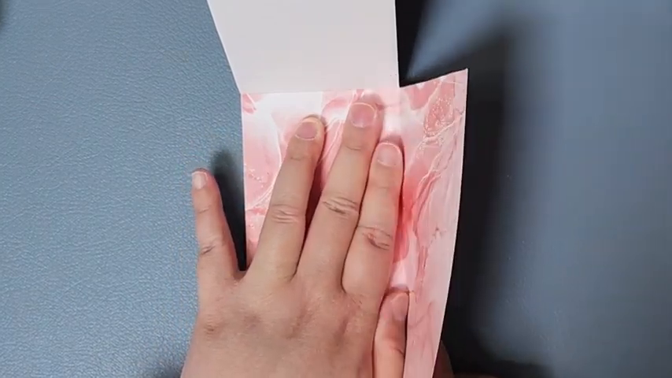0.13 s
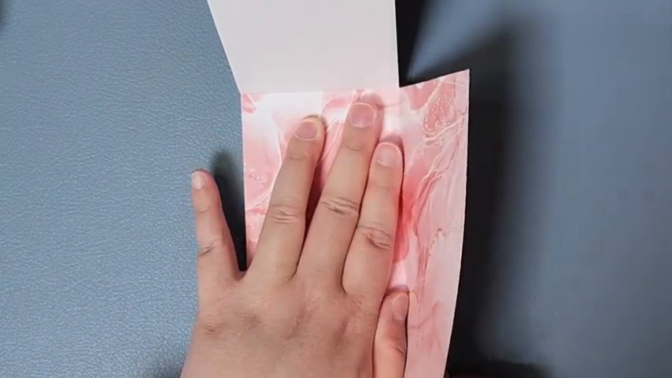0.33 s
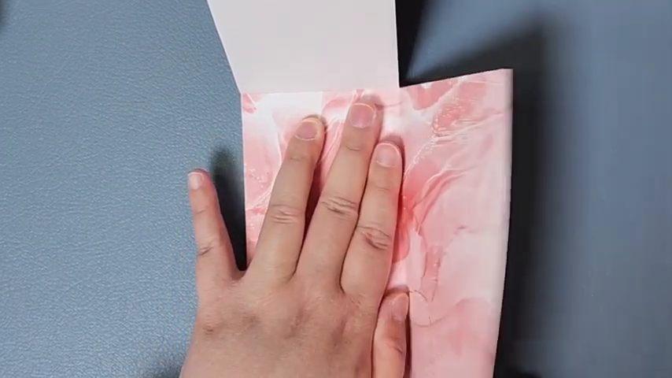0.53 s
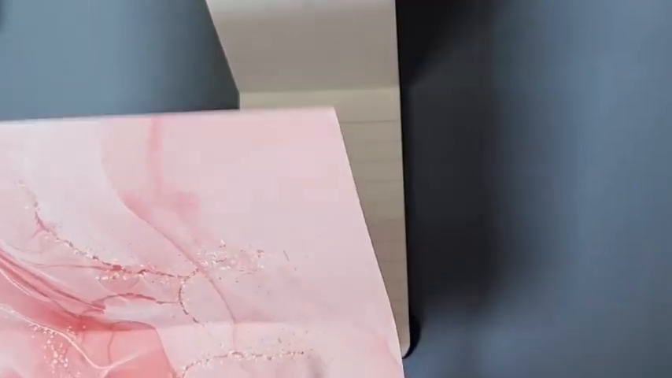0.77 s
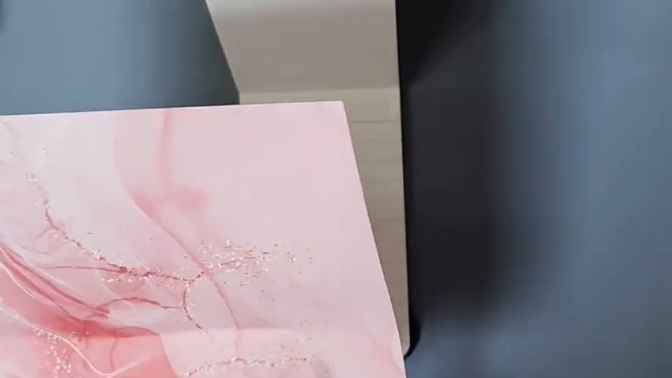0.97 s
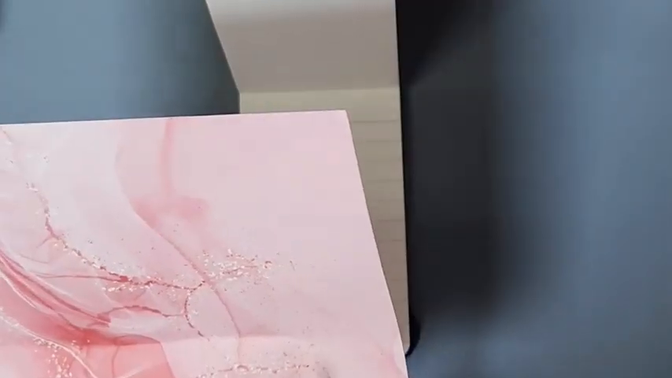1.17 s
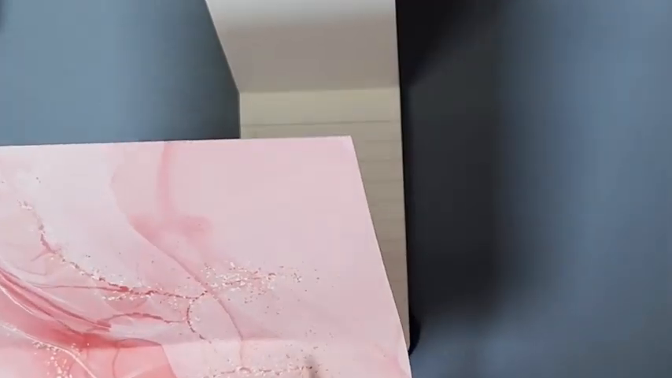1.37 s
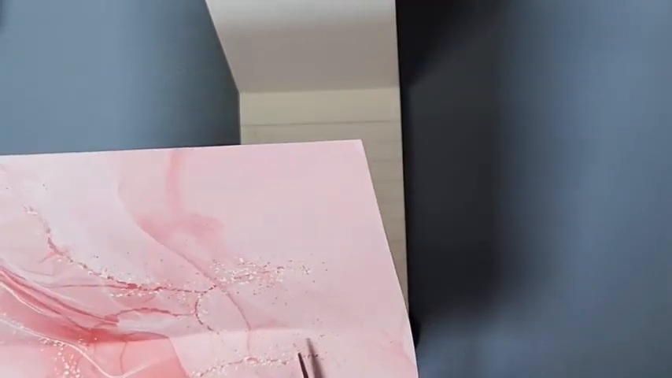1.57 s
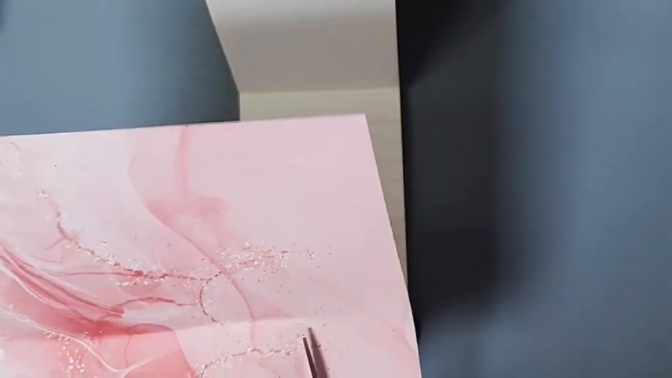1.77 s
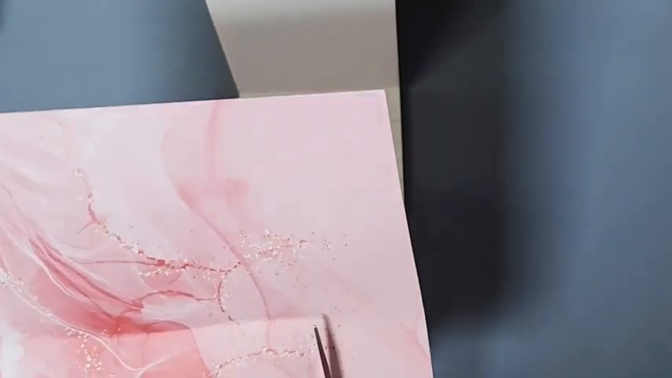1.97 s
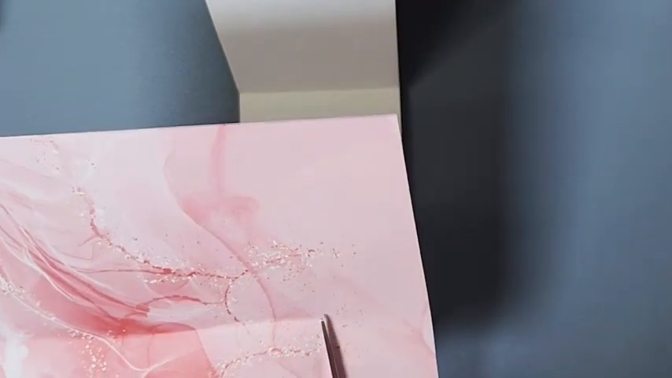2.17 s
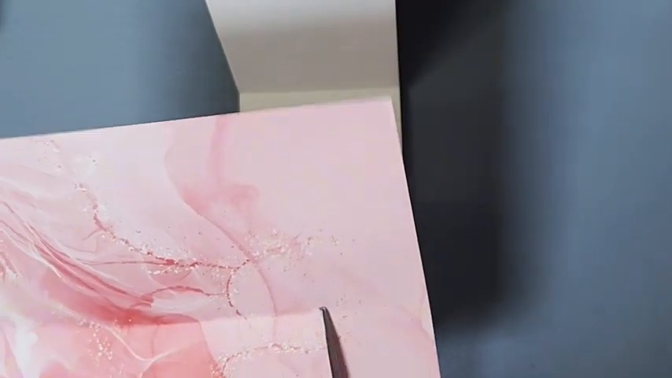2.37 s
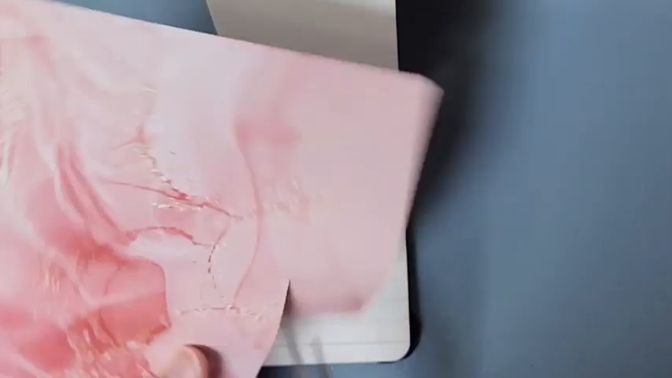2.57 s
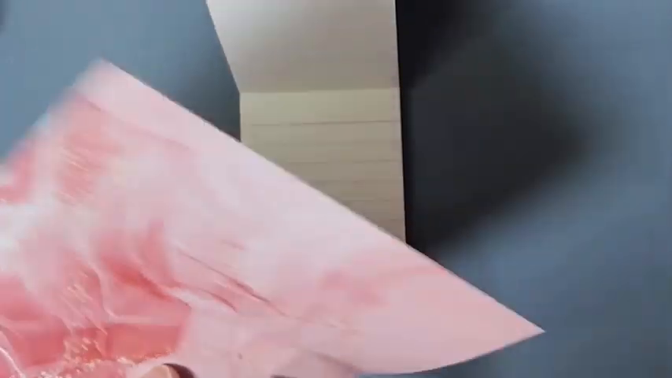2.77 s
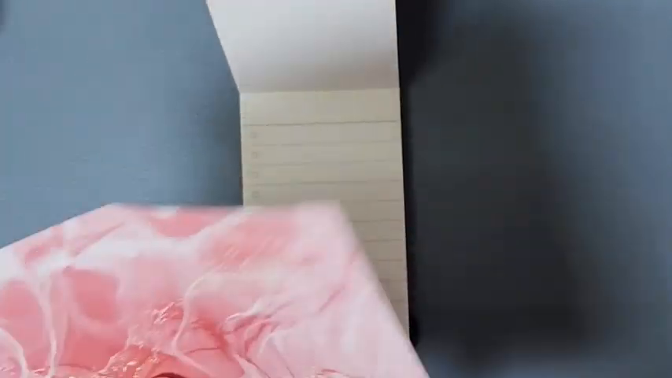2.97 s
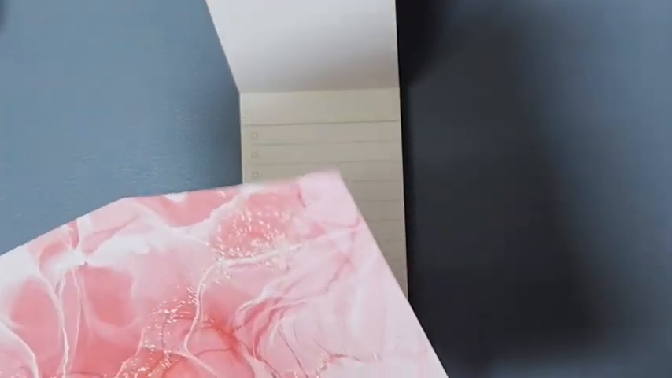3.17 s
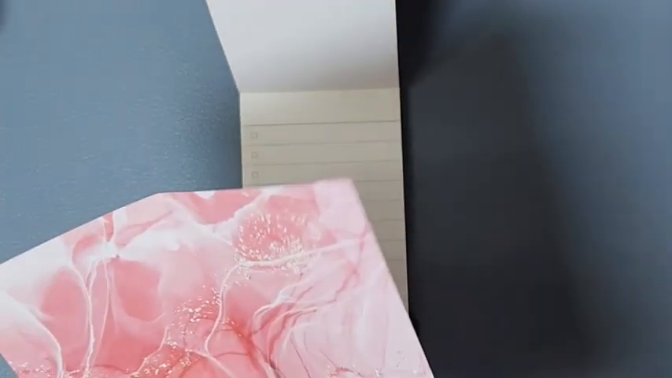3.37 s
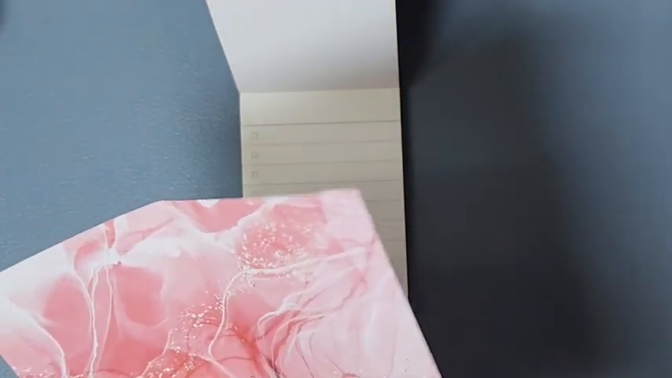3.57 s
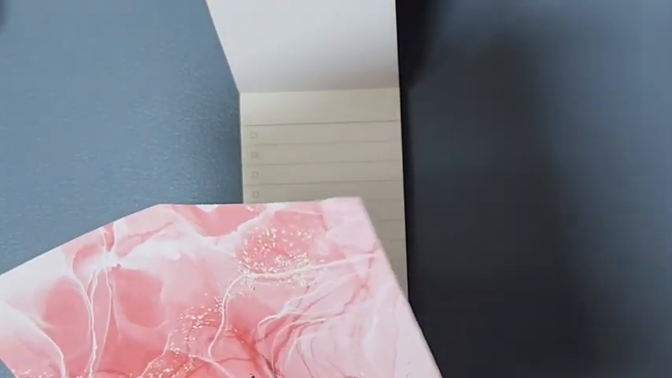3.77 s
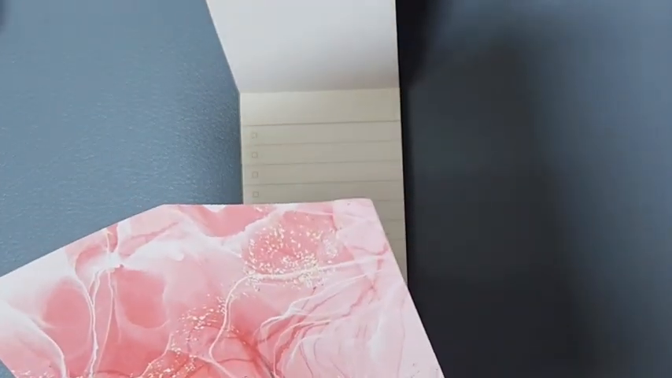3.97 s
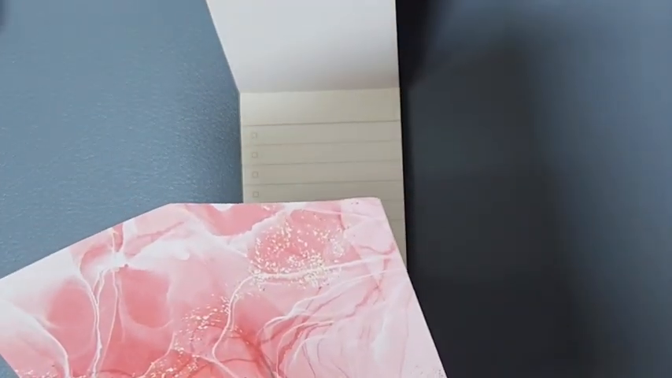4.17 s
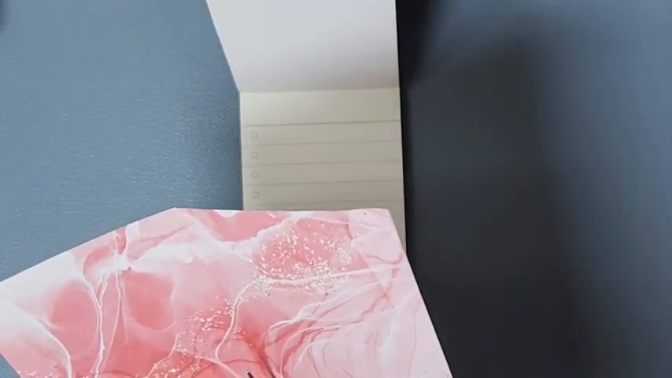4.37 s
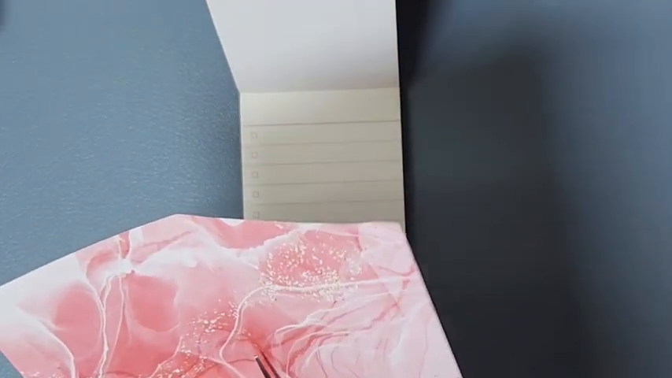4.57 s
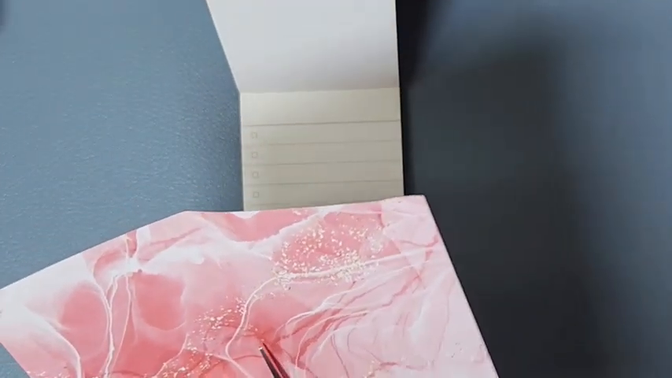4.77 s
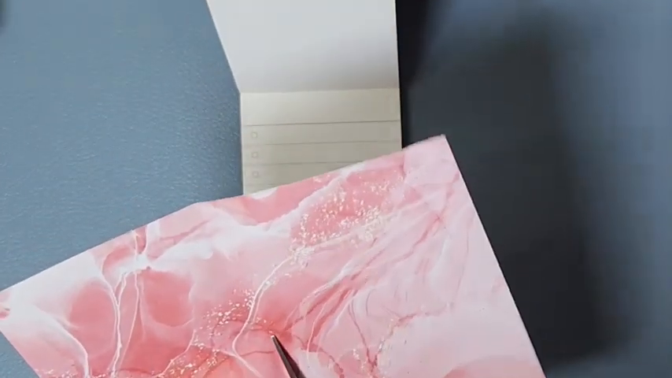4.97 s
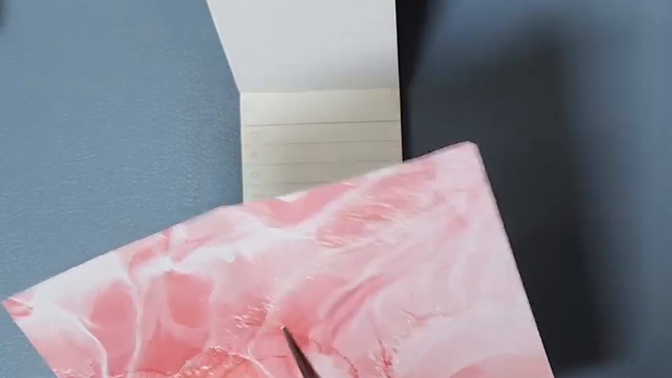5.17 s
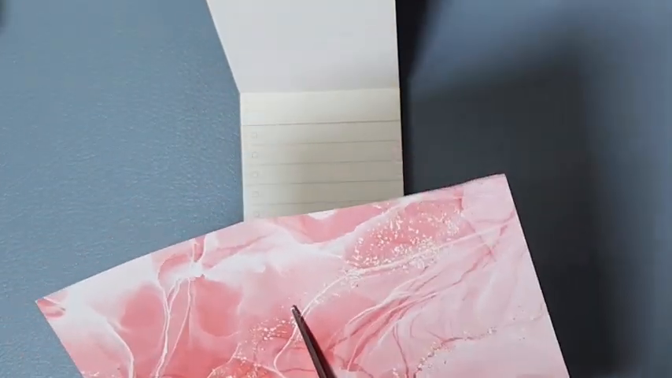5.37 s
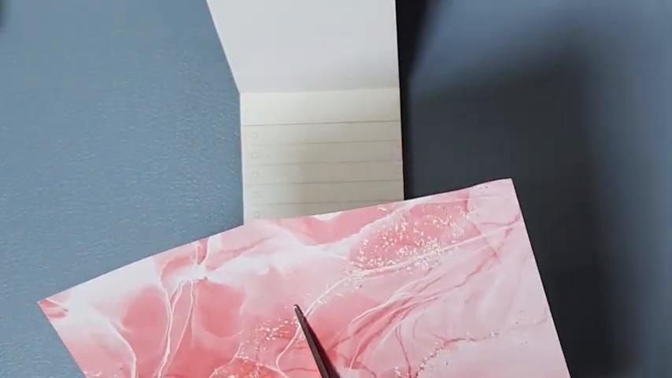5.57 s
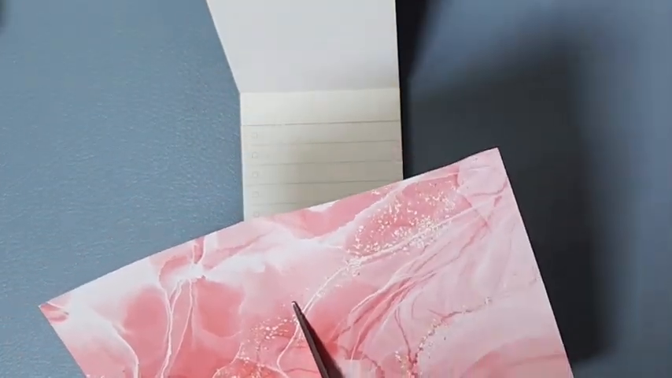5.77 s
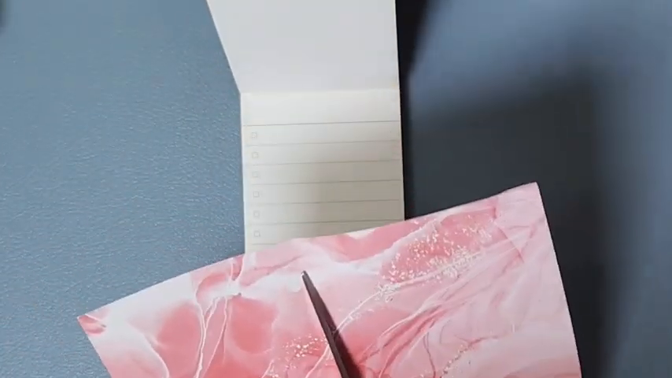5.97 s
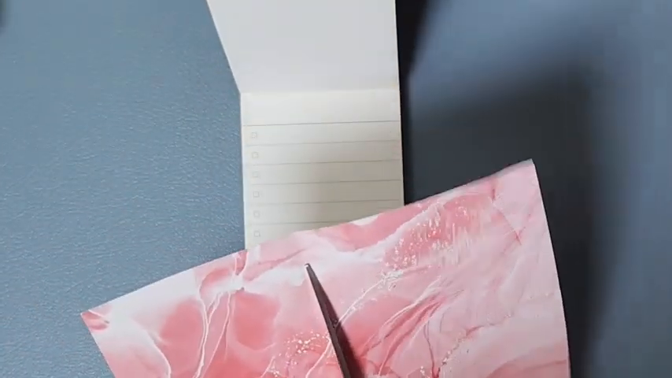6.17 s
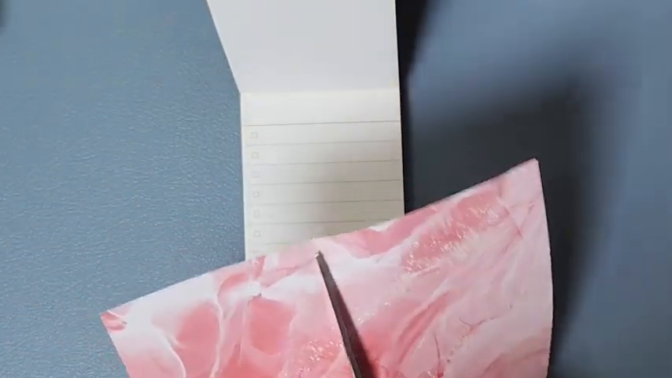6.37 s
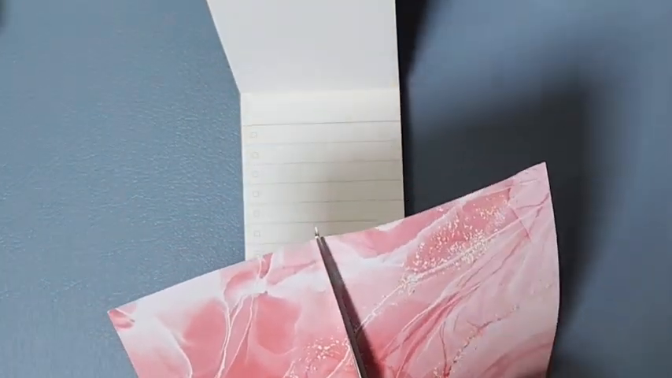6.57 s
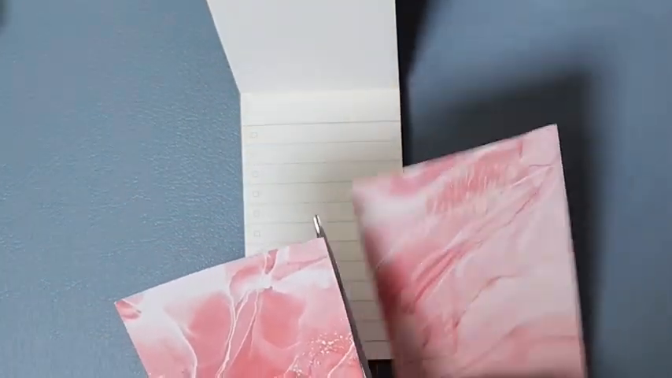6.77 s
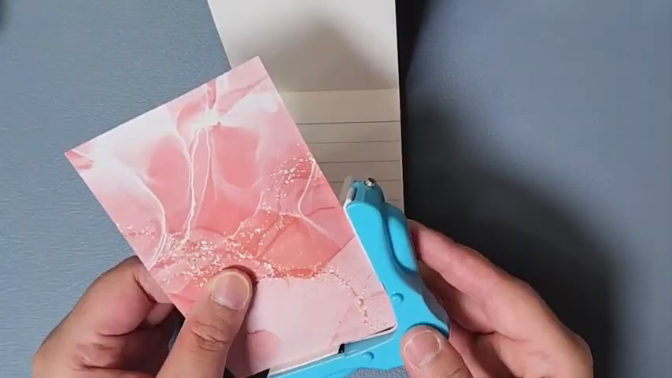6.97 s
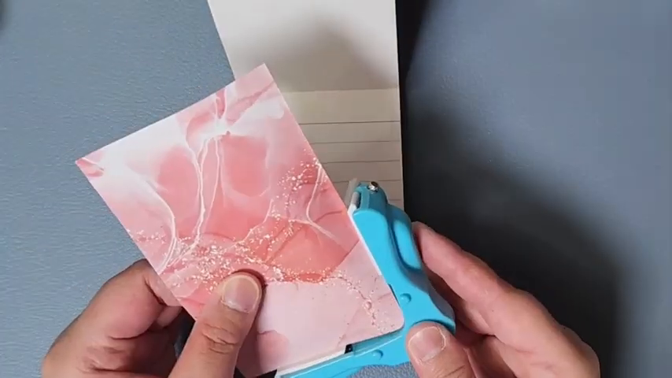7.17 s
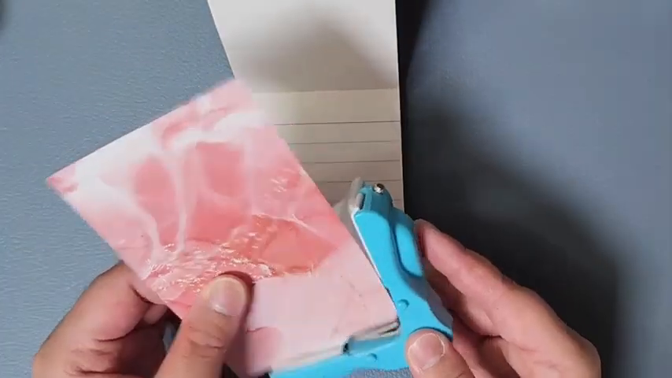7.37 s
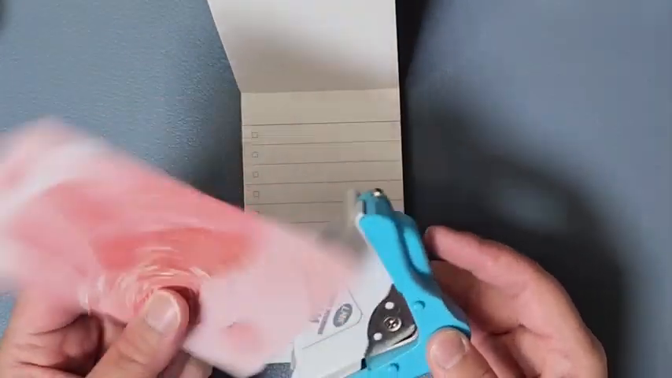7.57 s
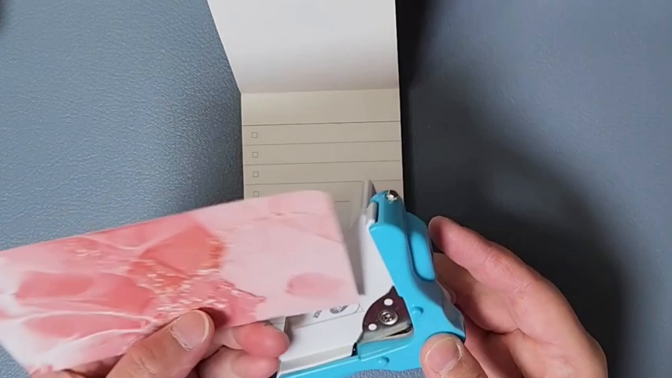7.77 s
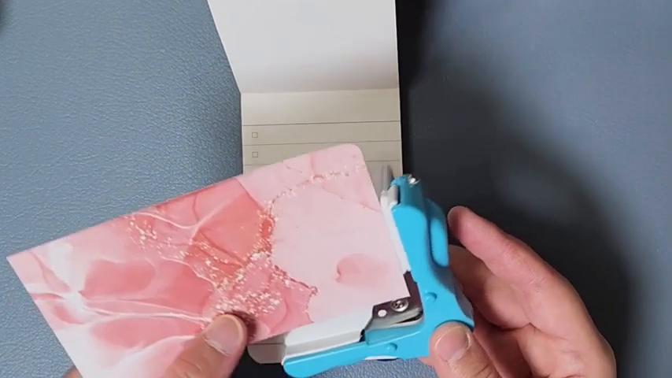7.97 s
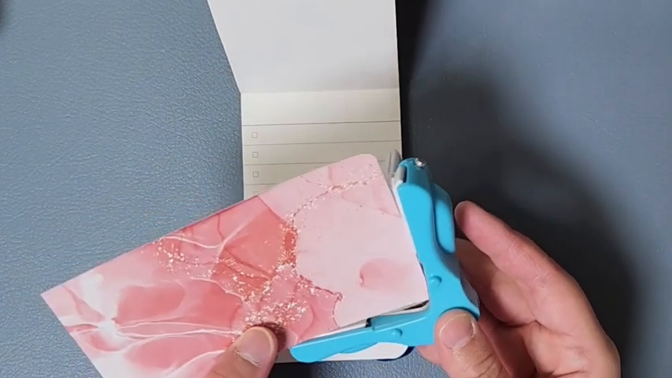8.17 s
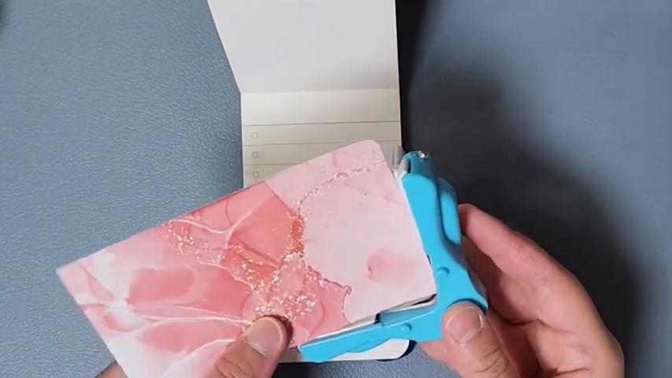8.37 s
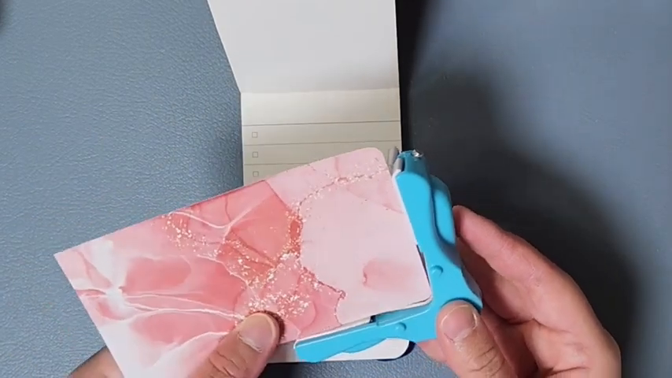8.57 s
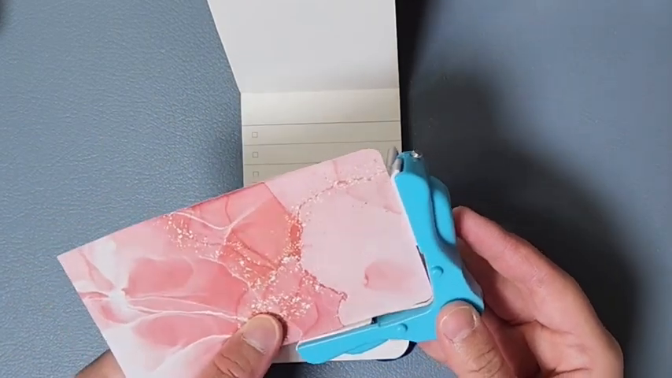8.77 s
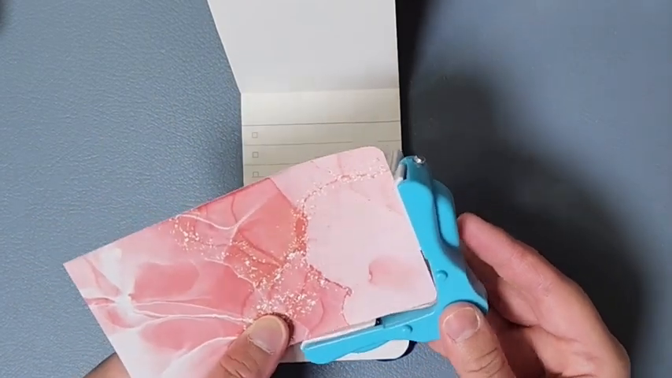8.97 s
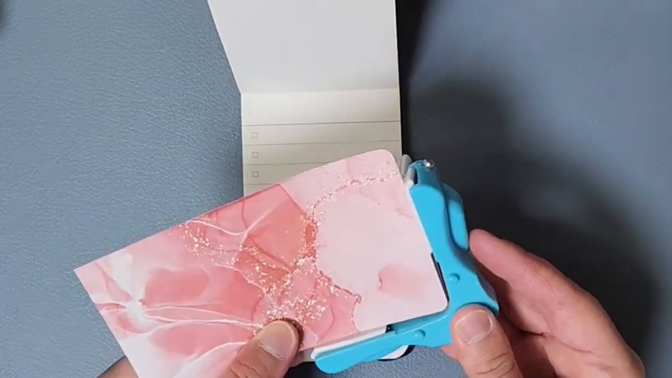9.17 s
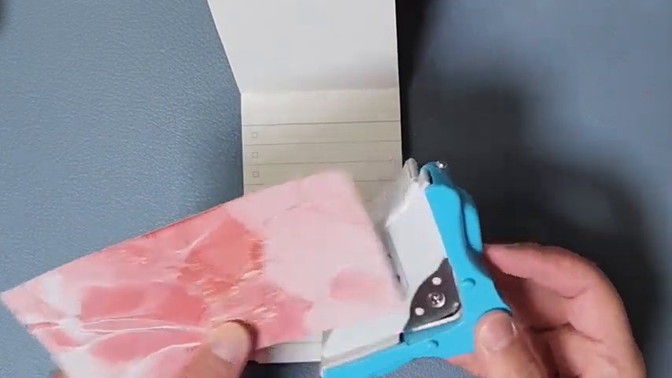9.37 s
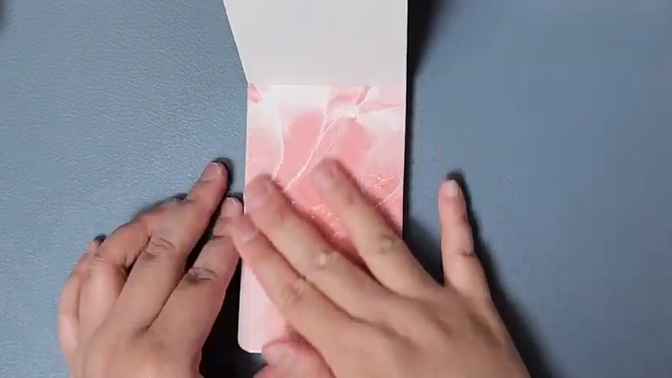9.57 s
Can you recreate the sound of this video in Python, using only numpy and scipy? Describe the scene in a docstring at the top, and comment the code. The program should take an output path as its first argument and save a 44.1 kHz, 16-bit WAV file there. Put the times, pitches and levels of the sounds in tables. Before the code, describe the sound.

A small quiet room, miked very close, with a faint hiss and low drone. From 0.1 s a sheet rustles briefly; dull fingertip thuds follow at 0.3 and 0.6 s. From 1.15 to 1.75 s scissors shear paper, gritty friction breaking into crunchy slips with a thin steel ring; the blades rub open, and a shorter, sharper cut ends in snaps at 2.3 s. A crisp flap of paper, knocks and rustling run to about 3.3 s, then it is quieter. A slow cut builds from 4.3 to 5.05 s, followed by short snips at 5.6, 6.15 and 6.7 s with rubbing blades between. Paper and handles knock around 6.8-7 s. A plastic punch cracks card at 7.2 s, its lever clacking at 7.25 and 7.45 s with rattle and thump. Light fumbling ticks follow; the punch bites again at 9.06 s, clacking at 9.1 and 9.33 s, then soft smoothing at 9.5 s.

```python
"""A low drone and faint hiss, then, close by, a sheet rustles and fingertips thud on a padded desk.
Scissors trim the sheet: gritty friction catches, breaks into slips of tearing fibres and rings the steel;
the blades rub as they open, the sheet rustles, hisses and crackles between the cuts, and things knock.
Then a plastic punch bites two corners of the card: bursts of cracking, stops with a rattle, damped spring
tones and a desk thump. A hand smooths the card. Noise through resonances makes all but the pure tones."""
import sys
import numpy as np
from scipy import signal
from scipy.fft import rfft, irfft, next_fast_len
from scipy.io import wavfile
from scipy.ndimage import uniform_filter1d, map_coordinates

SR = 44100
rng = np.random.default_rng(int(sys.argv[2]) if len(sys.argv) > 2 else 0)


def master_out(mix):
    """Clip the mix to full scale and print it as 16-bit PCM to the path in sys.argv[1]."""
    frames = np.transpose(np.atleast_2d(mix))
    ceiling = np.clip(frames, -1, 1)
    pcm = np.round(ceiling * 32767).astype(np.int16)
    wavfile.write(sys.argv[1], SR, pcm)


N = 423801   # samples

# Low drone in the room. Each row: centre in Hz, width in Hz, level in dB.
DRONE_BANDS = [(45, 4.8, -57), (58.2, 6.8, -56), (126, 9.6, -64.5)]
# Spectrum of the faint hiss. Each row: frequency in Hz, gain in dB.
HISS_SPECTRUM = [(100, -6), (220, -8.5), (350, -17.5), (800, -22), (2300, -27), (6800, -23.5), (7300, -33),
                 (15000, -33)]
HISS_DB = -62.5

# The sheet is slid, turned or smoothed. Each row: start in seconds, length in seconds, rustle in dB,
# flexing relative to rustle in dB, hiss relative to rustle in dB.
SLIDES_OF_SHEET = [(0.101, 0.068, -45, -8.5, -15), (0.205, 0.085, -45.5, -5.5, -12.5),
                   (0.484, 0.16, -54.5, -4, -17), (0.615, 0.037, -38, -8, 2.5),
                   (0.741, 0.13, -54, -15, -4.5), (1.002, .07, -47.5, -11, -4),
                   (2.393, 0.069, -57, 3.5, -1), (2.457, 0.2, -39, -6, 3), (2.558, 0.03, -25, -8.5, 0.5),
                   (2.613, 0.055, -41.5, -22, 6.5), (2.75, 0.23, -35, -5, -1.5),
                   (2.97, 0.14, -50.5, -10.5, 1.5), (3.2, 0.24, -53.5, 1, 0), (3.293, 0.022, -42, 4, -1),
                   (6.822, .04, -43.5, -3.5, -2.5), (6.851, 0.05, -31, -9.5, -6),
                   (7.14, 0.034, -36, -14.5, -9), (7.605, 0.26, -53, -4.5, 4), (7.978, 0.58, -59, 3, 1),
                   (8.496, 0.057, -50.5, -1, -3), (9.414, 0.061, -49.5, -5.5, 3.5),
                   (9.512, .1, -43.5, -7, 2.5)]
SLIDE_ATTACK_S, SLIDE_SAG_DB_PER_S = 0.032, 16
SLIDE_RELEASE = 2.2   # t60 of the dying slide, in lengths of the slide
# Spectrum of moving paper. Each row: frequency in Hz, gain in dB.
PAPER_SPECTRUM = [(88, -31.5), (150, -2), (396, -7.5), (471, -5), (966, -7.5), (1290, -5.5), (2060, -4),
                  (3690, -4.5), (4060, -8.5), (9540, -18.5), (15500, -27)]
# Resonances of the held sheet. Each row: centre in Hz, width in Hz, gain in dB.
SHEET_RESONANCES = [(546, 85, 1), (1260, 50, 9), (3700, 460, -1)]
SHEET_HZ, HOUSING_HZ = 1300, 1680   # main resonances of the sheet and of the punch housing
RESONANCE_OCTAVES = 0.22   # half width of a body's main resonance

# Jolts that reach the desk. Each row: start in seconds, level in dB.
DESK_JOLTS = [(0.121, -32.5), (2.344, -30.5), (2.55, -25), (2.919, -36), (9.05, -17)]
JOLT_HZ, JOLT_T60 = 86, 0.073   # Hz, seconds
# Fingertips landing on the paper. Each row: start in seconds, level in dB.
FINGER_TAPS = [(.338, -25.5), (.346, -25), (0.58, -24.5), (0.598, -28.5), (0.635, -30.5)]
# Spectrum of a fingertip on the pad. Each row: frequency in Hz, gain in dB.
TAP_SPECTRUM = [(200, -5), (460, -7.5), (620, 1.5), (880, 1), (1200, -27.5), (1550, -21.5), (2500, -52)]

# Strokes of the scissors. Each row: start in seconds, end in seconds, shear at the start in dB,
# shear at the end in dB, added first bite in dB, blade ring in dB, blade ring halfway in Hz, sheet hum in dB.
STROKES = [(1.147, 1.739, -52.5, -43, 15, 4.5, 5305, -14.5),
           (2.127, 2.343, -48.5, -43, -0.5, -1.5, 4020, -6.5),
           (4.301, 5.059, -53, -37.5, -4, 1.5, 5200, -2.5), (5.585, 5.714, -44, -43, -4, -7, 4130, -0.5),
           (6.139, 6.243, -37.5, -45, 0, -6, 4010, 0), (6.66, 6.808, -42, -21, -6, -8.5, 3960, -9.5)]
# Colour of the slips of each stroke, from its first slip to its last. Each row: bass in dB,
# first treble in dB, last treble in dB, first sheet resonance in dB, last sheet resonance in dB.
STROKE_TONES = [(-5, 11, -4.5, -3, 3), (10, 0.5, 14, 8, -3.5), (-3.5, 6, -4, -10.5, 26),
                (2, -7, -2.5, 17, 12), (-13, -10, -15, 12, 1.5), (-14, -15, 8, -5.5, 2.5)]
BITE_S, RING_FADE_DB = 0.07, 11   # the first bite eases off; the ring is damped as the blades close
# Louder slips of the blades through the sheet. Each row: start in seconds, length in seconds,
# level in dB before a common trim.
BLADE_SLIPS = [(1.407, 0.042, -43.5), (1.443, 0.023, -39), (1.479, 0.019, -37.5), (1.53, 0.017, -36),
               (1.555, 0.013, -34), (1.574, 0.063, -34.5), (1.639, 0.013, -29), (1.664, 0.021, -26.5),
               (1.693, 0.017, -27.5), (1.724, 0.011, -31), (2.123, 0.0065, -45), (2.152, 0.0091, -23),
               (2.167, 0.013, -30), (2.192, 0.013, -22.5), (2.235, .016, -21.5), (2.261, 0.0099, -28.5),
               (2.299, 0.0043, -14.5), (2.32, 0.01, -22.5), (2.3387, 0.0062, -11.5), (4.578, 0.011, -52),
               (4.644, 0.0065, -40), (4.668, .012, -42), (4.747, 0.024, -38.5), (4.778, 0.017, -38.5),
               (4.822, .009, -36.5), (4.837, 0.017, -33.5), (4.859, 0.017, -35.5), (4.883, 0.034, -31.5),
               (4.92, 0.024, -27), (4.965, 0.011, -14), (5.007, 0.0069, -8.5), (5.035, 0.007, -34),
               (5.584, 0.0075, -31.5), (5.598, .012, -24.5), (5.614, 0.03, -23), (5.645, .013, -28),
               (5.671, 0.01, -18), (6.144, 0.014, -23), (6.158, 0.038, -24), (6.208, 0.0096, -13),
               (6.673, 0.026, -25), (6.709, 0.011, -16), (6.723, 0.01, -16), (6.737, 0.01, -12),
               (6.763, 0.0051, -9), (6.767, 0.012, -24), (6.787, 0.0089, -33)]
SLIP_S, SHORT_SLIP_DB_PER_OCTAVE = 0.018, 2   # a slip shorter than this is brighter, a longer one duller
CREAK_S = 0.005   # creak before and after a fracture
# Spectra of a slip and of the steady shear. Each row: frequency in Hz, gain in dB.
SLIP_SPECTRUM = [(180, -17), (330, -13), (519, -6), (703, -8.5), (951, 1.5), (1287, -2), (1743, 0),
                 (2359, -4.5), (3192, -0.5), (4321, -3), (5848, -8), (7915, -10.5), (10713, -11.5),
                 (14500, -21.5)]
SHEAR_SPECTRUM = [(150, -11), (480, -6), (800, -9), (1300, -5.5), (2200, -7), (3400, -4.5), (6700, -8),
                  (11000, -16), (15500, -20)]
# Steel resonances rung by the grit; each stroke scales them so that the second lies at its blade ring
# halfway. Each row: centre before scaling in Hz, width before scaling in Hz, level in dB.
BLADE_RESONANCES = [(4480, 220, -2), (5400, 390, 9), (7500, 350, -7), (9900, 500, -8.5), (13200, 700, -4.5)]

# Blades rubbing as they open. Each row: start in seconds, end in seconds, level in dB,
# treble in dB, squeak in dB.
BLADE_OPENINGS = [(1.852, 1.993, -36.5, 4, 1), (5.16, 5.353, -31, 0, -5.5),
                  (5.832, 6.017, -31.5, -2.5, -2.5), (6.336, 6.512, -26, -5.5, 4.5)]
# Spectrum of the rubbing blades. Each row: frequency in Hz, gain in dB.
OPENING_SPECTRUM = [(88, -69), (150, -13), (388, -10), (471, -6), (668, -11), (722, -8), (1020, -11),
                    (1370, -4.5), (2180, -6), (2450, -4), (2760, -8), (3620, -7), (15500, -24)]
SQUEAK_HZ = 2420

# Tools and card knocking in the hands. Each row: start in seconds, t60 in seconds,
# level in dB before a common trim, treble in dB, resonance in Hz.
HAND_KNOCKS = [(2.346, 0.096, -16.5, 7, 545), (2.509, 0.13, -25, 14, 1160), (2.555, .011, -15.5, 10, 374),
               (2.92, 0.06, -11.5, -20, 780), (5.014, 0.046, -38, -5, 1300), (5.683, 0.072, -22, 5, 1100),
               (6.217, 0.069, -21, 3, 1260), (6.805, .024, -9.5, -10, 894), (6.82, 0.06, -15.5, -38, 2510),
               (6.939, 0.024, -15, -10, 2740), (7.0403, 0.05, -13, -29.5, 1410),
               (7.4, 0.032, -19.5, -4.5, 740), (7.666, 0.067, -42.5, -13.5, 476),
               (7.712, 0.097, -36.5, 9, 457), (8.054, 0.033, -37.5, -33, 396),
               (8.15, 0.041, -29.5, -8.5, 1730), (8.31, 0.061, -30, -15, 1260), (8.457, 0.13, -44, 8, 475),
               (8.548, 0.1, -30, 3, 600), (8.653, 0.039, -36.5, 0, 497), (8.679, 0.048, -20, -11.5, 388),
               (8.979, 0.079, -21.5, -11, 1490), (9.032, 0.081, -31.5, 1, 4370),
               (9.068, 0.029, -17, -22, 1743), (9.078, 0.058, -16, -11, 1090),
               (9.324, 0.046, -23, -11, 1760)]
# Spectrum of knocks, ticks and scuffs. Each row: frequency in Hz, gain in dB.
KNOCK_SPECTRUM = [(180, -4.5), (330, -2.5), (519, -2.5), (703, -1), (951, -7), (1287, -2.5), (1743, -3.5),
                  (2359, -5.5), (3192, -7), (4321, -9), (5848, -16.5), (7915, -17.5), (10713, -22),
                  (14500, -27.5)]
KNOCK_HZ, KNOCK_BASS_DB_PER_OCTAVE = 850, 7   # a knock pitched below this carries more bass
# Light ticks of card and plastic. Each row: start in seconds, level in dB.
LIGHT_TICKS = [(2.612, -32), (2.852, -30), (3.344, -46), (5.54, -49), (6.283, -41), (7.11, -42.5),
               (7.138, -39.5), (7.817, -45), (8.01, -45.5), (8.508, -41), (8.739, -49), (8.955, -51),
               (9.277, -40)]

# The sheet scuffs the blades or the fingers as it is lined up. Each row: start in seconds,
# length in seconds, level in dB.
SHEET_SCUFFS = [(3.172, 0.19, -50), (5.068, 0.052, -56), (5.349, .08, -55), (6.292, 0.038, -47),
                (6.527, 0.074, -50.5), (6.602, 0.073, -47.5), (8.218, 0.086, -53.5)]

# The die cracks through the card. Each row: start in seconds, level in dB before a common trim, treble in dB.
DIE_CRACKS = [(7.2004, -5, 16), (7.2098, -9, -0.5), (7.2322, -5, -6), (9.063, -12.5, 15.5)]
CRACK_S, CRACK_BASS_DB, CRACK_HOUSING_DB = 0.0037, 2, 17.5
# The punch lever hits its stop, pressed then released. Each row: start in seconds, level in dB before a
# common trim, treble in dB, housing resonance in dB, rattle in dB, spring in dB, desk thump in dB.
LEVER_STOPS = [(7.249, -6.5, 15, -15, -13.5, -52.5, -28), (7.45, -5.5, 13.5, 14.5, -18, -46, -19.5),
               (9.1118, -9.5, 21, 14.5, -12.5, -38, -19.5), (9.333, -8, 8.5, 12, -17.5, -52, -12.5)]
STOP_S, STOP_BASS_DB = 0.005, 3.5
# Spectrum of cracks, stops and rattle. Each row: frequency in Hz, gain in dB.
SNAP_SPECTRUM = [(180, -7), (330, -11), (519, -10.5), (703, -8), (951, -5), (1287, 1), (1743, 0.5),
                 (2359, 0.5), (3192, 1), (4321, -4.5), (5848, -4), (7915, -5), (10713, -10), (14500, -22)]
RATTLE_DELAY_S, RATTLE_T60, RATTLE_BASS_DB, RATTLE_TREBLE_DB = 0.0075, 0.11, 3, 4
THUMP_DELAY_S, THUMP_HZ, THUMP_T60 = 0.0073, 72, 0.15
# Tones of the punch's spring. Each row: frequency in Hz, relative level in dB, t60 in seconds.
SPRING_TONES = [(5071, -6.5, .35), (6740, 7, .12), (7660, 6, 0.14)]

# Narrow resonances of the desk and the things on it. Each row: centre in Hz, width in Hz, gain in dB.
DESK_RESONANCES = [(479.2, 10, 4.5), (1091, 15, 4.5), (1312, 32, 4), (1669, 46, 4), (2436, 73, 4.5),
                   (3747, 210, 2), (6820, 140, 0.5)]
TAIL_DB, TAIL_T60 = -34, 0.28   # dull tail of the room
PEAK_LIMIT, CUTOFF_HZ = 1.02, 15700


def from_db(db):
    """Decibel law: 20 dB is a tenfold amplitude."""
    return 10 ** (np.asarray(db) / 20)


def rms_one(x):
    """Normalisation to unit effective value."""
    return x / np.sqrt(np.mean(x ** 2) + 1e-20)


def at_hz(points, hz):
    """Spectral gain in dB, interpolated on a logarithmic frequency axis."""
    table = np.array(points)
    return np.interp(np.log(hz + 1), np.log(table[:, 0]), table[:, 1])


def peaks(modes, hz):
    """Resonance curves: gain in dB that falls away on both sides of each centre."""
    return sum(db / (1 + (2 * (hz - centre) / width) ** 2) for centre, width, db in modes)


def add(out, s, sound):
    """Superposition: mix a sound in from time s on."""
    start = max(round(s * SR), 0)
    out[start:start + len(sound)] += sound[:N - start]


def shaped(x, db_at):
    """Causal (minimum-phase) filtering with a gain in dB given as a function of frequency."""
    size = 2 * next_fast_len(len(x) // 2 + 1024)
    hz = np.arange(size // 2 + 1) * SR / size
    cepstrum = irfft(np.log(from_db(db_at(hz))))
    # folding the cepstrum onto positive time gives minimum phase
    cepstrum[1:size // 2] *= 2
    cepstrum[size // 2 + 1:] = 0
    return irfft(rfft(x, size) * np.exp(rfft(cepstrum)))[:len(x)]


def cut(x, hz, kind, order=2):
    """Maximally flat (Butterworth) filtering."""
    return signal.sosfilt(signal.butter(order, hz, kind, fs=SR, output="sos"), x)


def drift(rate, size):
    """Bounded random fluctuation: values from -1.4 to 2.2, drawn rate times a second, joined by lines."""
    return np.interp(np.arange(size) * rate / SR, np.arange(N), rng.uniform(-1.4, 2.2, N))


def friction(db_at, grain_db, grain_rate):
    """Dry friction: fibres catch and let go, giving hiss in short grains."""
    grains = rng.standard_normal(N) * from_db(grain_db * drift(grain_rate, N))
    return cut(shaped(grains, db_at), 190, "high")


def resonate(x, modes):
    """Forced vibration: friction sets a few broad resonances ringing; rms 1."""
    total = 0
    for hz, width, db in modes:
        band = cut(x, [hz - width / 2, hz + width / 2], "band", order=1)
        total = total + from_db(db) * rms_one(band)
    return rms_one(total)


def burst(envelope, span, colour, level_db, bass_db, treble_db, ring_hz, ring_db):
    """Random excitation: a crowd of tiny contacts shakes a body; the level is the rms over span seconds."""
    def body(hz):
        bass = 1 / (1 + (hz / 700) ** 3)
        treble = hz ** 2 / (hz ** 2 + 4000 ** 2)
        ring = 1 / (1 + (np.log2((hz + 1) / ring_hz) / RESONANCE_OCTAVES) ** 2)
        return at_hz(colour, hz) + bass_db * bass + treble_db * treble + ring_db * ring
    contacts = envelope * rng.standard_normal(len(envelope))
    sound = cut(shaped(contacts, body), 82, "high")
    return from_db(level_db) * sound * np.sqrt(span * SR / np.sum(sound ** 2))


def blow(t60, colour, db, bass_db, treble_db, ring_hz, ring_db, size=8192):
    """Impact: a sudden contact whose vibration decays exponentially."""
    t = np.arange(size) / SR
    envelope = from_db(-60 * t / t60) * (1 - np.exp(-t / 0.00093))
    span = t60 / np.log(10 ** 6)   # time constant of the energy
    return burst(envelope, span, colour, db, bass_db, treble_db, ring_hz, ring_db)


def damped(hz, t60, size=16384):
    """Damped free oscillation: a sine that decays exponentially."""
    t = np.arange(size) / SR
    return np.sin(2 * np.pi * hz * t) * from_db(-60 * t / t60)


def bounce(db, hz, t60, give_s=0.0022):
    """Damped mass on a soft support: the padded desk top gives way and swings."""
    swing = from_db(db) * damped(hz, t60)
    return swing * (1 - np.exp(-np.arange(len(swing)) / SR / give_s))


def fracture(length, crest, colour, db, bass_db, treble_db, ring_hz, ring_db, creak=0.1, size=4096):
    """Progressive fracture: after a short creak a run of breaking fibres swells and stops within its length."""
    t = np.arange(size) / SR - CREAK_S
    peak = np.clip(crest, 0.05, 0.9)   # fraction of the length
    swell = np.sqrt(np.interp(t / length, [0, peak, 1], [0, 1, 0]))
    swell += creak * np.interp(t, [-CREAK_S, 0, length, length + CREAK_S], [0, 1, 1, 0])
    return burst(swell, length, colour, db, bass_db, treble_db, ring_hz, ring_db)


def background():
    """Stationary narrow-band and broad-band noise: a wavering low drone under faint hiss."""
    hiss = cut(shaped(rng.standard_normal(N), lambda hz: at_hz(HISS_SPECTRUM, hz)), 47, "high")
    out = from_db(HISS_DB) * rms_one(hiss)
    for hz, width, db in DRONE_BANDS:
        edges = [hz * np.exp(-width / hz / 2), hz * np.exp(width / hz / 2)]
        band = cut(rng.standard_normal(N + SR), edges, "band")[SR:]   # first second lets the filter settle
        out += from_db(db) * rms_one(band)
    return out


def slide_gains():
    """Sliding motion, as gains of flexing, rustle and hiss: it sets in, sags and dies, a long one more slowly."""
    t, flex, rustle, hiss = np.arange(SR) / SR, np.zeros(N), np.zeros(N), np.zeros(N)
    for s, length, db, flex_db, hiss_db in SLIDES_OF_SHEET:
        release_db = 60 * np.maximum(t / length - 1, 0) / SLIDE_RELEASE
        speed = np.minimum(t / SLIDE_ATTACK_S, 1) * from_db(db - SLIDE_SAG_DB_PER_S * t - release_db)
        add(flex, s, from_db(flex_db) * speed)
        add(rustle, s, speed)
        add(hiss, s, from_db(hiss_db) * speed)
    return flex, rustle, hiss


def sheet(flex_db=0, rustle_db=-3.4, hiss_db=-3.4, surge_db=4.0, surge_rate=90, crackle_db=2.0,
          buckles_per_s=110, buckle_db=24):
    """Plate flexure and friction: paper flexes low, rustles mid, hisses high; tiny buckles crackle through."""
    def colour(hz):
        return at_hz(PAPER_SPECTRUM, hz) + peaks(SHEET_RESONANCES, hz)
    struck = rng.random(N) < buckles_per_s / SR
    buckles = struck * rng.uniform(-1.1, 1, N) * from_db(buckle_db)
    rubbing = friction(colour, grain_db=crackle_db, grain_rate=600)
    paper = rubbing + cut(shaped(buckles, colour), 400, "high")
    low = cut(paper, 700, "low", order=3)
    middle = cut(paper, [900, 4000], "band", order=3)
    high = cut(paper, 5420, "high", order=3)
    out = np.zeros(N)
    for db, gain, part in zip((flex_db, rustle_db, hiss_db), slide_gains(), (low, middle, high)):
        surging = rms_one(part * from_db(surge_db * drift(surge_rate, N)))
        out += from_db(db) * gain * surging
    return out


def hands(work, rumble_db=-34, low_hz=55, high_hz=155, hand_s=0.11):
    """Structure-borne rumble: the working hands shake the desk, more as they work harder."""
    effort = np.sqrt(np.abs(uniform_filter1d(np.abs(work), int(hand_s * SR))))
    rumble = rms_one(cut(rng.standard_normal(N), [low_hz, high_hz], "band", order=3))
    return from_db(rumble_db) * effort * rumble


def desk(tap_t60=0.069):
    """Impact on a soft layer: jolts bounce the desk top; fingertips thud softly on the paper pad."""
    out = np.zeros(N)
    for s, db in DESK_JOLTS:
        add(out, s, bounce(db, JOLT_HZ, JOLT_T60))
    for s, db in FINGER_TAPS:
        add(out, s, blow(tap_t60, TAP_SPECTRUM, db, 0, 0, SHEET_HZ, 0))
    return out


def scissors():
    """Stick-slip, then sliding: a gritty shear breaks into slips; a smooth rub follows as the blades open."""
    return cutting() + opening()


def cutting(catches_per_s=40, uneven=0.3, catch_db=10.5, surge_db=5.3, glide=0.11, edge_s=0.023, follow_s=0.004):
    """Stick-slip shear: catches deepen toward the tips; the ring rises in pitch as the free length shortens."""
    out = np.zeros(N)
    grit = rms_one(friction(lambda hz: at_hz(SHEAR_SPECTRUM, hz), grain_db=4.0, grain_rate=900))
    steel = resonate(grit, BLADE_RESONANCES)
    hum = resonate(grit, [(520, 230, 0.2), (1350, 40, -1.2)])   # Hz, width in Hz, dB
    catch_rate = catches_per_s * np.exp(uneven * drift(catches_per_s, N))
    catches = np.sin(2 * np.pi * np.cumsum(catch_rate) / SR)
    surges = surge_db * drift(catches_per_s, N)
    for (start, end, first_db, last_db, bite_db, ring_db, ring_hz, hum_db), tone in zip(STROKES, STROKE_TONES):
        span = np.arange(int(start * SR), int(end * SR))
        t, progress = (span - span[0]) / SR, np.linspace(0, 1, len(span))
        bite = bite_db * np.exp(-(t / BITE_S) ** 2 / 2)
        force = from_db(first_db + (last_db - first_db) * progress + bite)
        edges = np.clip(np.minimum(t, t[-1] - t) / edge_s, 0, 1)
        grip = rms_one(from_db(catch_db * progress ** 2 * catches[span] + surges[span])) * edges
        stroke = slips(start, end, tone)
        stroke[span] += force * grip * (grit[span] + from_db(hum_db) * hum[span])
        # reading the ringing steel faster or slower shifts its pitch
        pitch = ring_hz / BLADE_RESONANCES[1][0] * (1 + glide * (progress - 0.5))
        ring = map_coordinates(steel, [span[0] + np.cumsum(pitch)], order=3)
        loudness = np.sqrt(np.abs(uniform_filter1d(stroke[span] ** 2, int(follow_s * SR))))
        stroke[span] += from_db(ring_db - RING_FADE_DB * progress) * ring * loudness
        out += stroke
    return out


def slips(start, end, tone, crest=0.36, trim_db=-1.94):
    """Sudden release of stored strain: the slips of a stroke, whose colour shifts from first to last."""
    out = np.zeros(N)
    rows = [row for row in BLADE_SLIPS if start - SLIP_S < row[0] < end]
    bass_db, first_treble_db, last_treble_db, first_ring_db, last_ring_db = tone
    for (s, length, db), travel in zip(rows, np.linspace(0, 1, len(rows))):
        treble_db = first_treble_db + travel * (last_treble_db - first_treble_db)
        treble_db += SHORT_SLIP_DB_PER_OCTAVE * np.log2(SLIP_S / length)
        ring_db = first_ring_db + travel * (last_ring_db - first_ring_db)
        slip = fracture(length, crest, SLIP_SPECTRUM, db + trim_db, bass_db, treble_db, SHEET_HZ, ring_db)
        add(out, s - CREAK_S, slip)
    return out


def opening(rise_s=0.048, fall_s=0.036, grain_db=2.0, grain_rate=700, size=16384):
    """Sliding friction: steel rubs over steel while the blades part."""
    out, t = np.zeros(N), np.arange(size) / SR
    for start, end, db, treble_db, squeak_db in BLADE_OPENINGS:
        speed = np.clip(t / rise_s, 0, 1) * np.clip((end - start - t) / fall_s, 0, 1)
        rub = speed * from_db(grain_db * drift(grain_rate, size))
        span = np.sum(speed ** 2) / SR
        add(out, start, burst(rub, span, OPENING_SPECTRUM, db, 0, treble_db, SQUEAK_HZ, squeak_db))
    return out


def knocks(ring_db=7, trim_db=-0.84, tick_t60=0.045, tick_treble_db=8):
    """Impact of light bodies: handles meet, the card flips and is pushed into the slot; its edges tick."""
    out = np.zeros(N)
    for s, t60, db, treble_db, hz in HAND_KNOCKS:
        bass_db = KNOCK_BASS_DB_PER_OCTAVE * np.log2(KNOCK_HZ / hz)
        add(out, s, blow(t60, KNOCK_SPECTRUM, db + trim_db, bass_db, treble_db, hz, ring_db))
    for s, db in LIGHT_TICKS:
        add(out, s, blow(tick_t60, KNOCK_SPECTRUM, db, 0, tick_treble_db, HOUSING_HZ, 0))
    return out


def scuffs(ring_db=9, treble_db=-8, uneven_db=5, uneven_rate=70, edge_s=0.009, size=8192):
    """Friction-driven resonance: light uneven rubbing sets the sheet's main resonance going."""
    out, t = np.zeros(N), np.arange(size) / SR
    for s, length, db in SHEET_SCUFFS:
        edges = np.clip(np.minimum(t, length - t) / edge_s, 0, 1)
        rub = edges * from_db(uneven_db * drift(uneven_rate, size))
        add(out, s, burst(rub, length, KNOCK_SPECTRUM, db, 0, treble_db, SHEET_HZ, ring_db))
    return out


def punch(crest=0.12, trim_db=-1.5):
    """Fracture and impact: the die cracks the card in steps; each stop brings rattle, spring and desk bounce."""
    out = np.zeros(N)
    for s, db, treble_db in DIE_CRACKS:
        crack = fracture(CRACK_S, crest, SNAP_SPECTRUM, db + trim_db, CRACK_BASS_DB, treble_db,
                         HOUSING_HZ, CRACK_HOUSING_DB)
        add(out, s - CREAK_S, crack)
    spring = sum(from_db(db) * damped(hz, t60) for hz, db, t60 in SPRING_TONES)
    for s, db, treble_db, housing_db, rattle_db, spring_db, thump_db in LEVER_STOPS:
        stop = fracture(STOP_S, crest, SNAP_SPECTRUM, db + trim_db, STOP_BASS_DB, treble_db,
                        HOUSING_HZ, housing_db)
        rattle = blow(RATTLE_T60, SNAP_SPECTRUM, rattle_db, RATTLE_BASS_DB, RATTLE_TREBLE_DB, HOUSING_HZ, 0)
        add(out, s - CREAK_S, stop)
        add(out, s + RATTLE_DELAY_S, rattle)
        add(out, s + RATTLE_DELAY_S, from_db(spring_db) * spring)
        add(out, s + THUMP_DELAY_S, bounce(thump_db, THUMP_HZ, THUMP_T60))
    return out


def room(x, wet_db=-16, t60=0.085, wall_hz=6500, size=16384):
    """Reverberation: quick reflections from the desk and near walls, then a faint dull tail."""
    t = np.arange(size) / SR
    early, late = rng.standard_normal((2, size)) * (t > 0.003)
    early = cut(early, wall_hz, "low", order=1) * from_db(-60 * t / t60)
    late = cut(late, 3000, "low", order=1) * from_db(-60 * t / TAIL_T60)
    response = (from_db(wet_db) * rms_one(early) + from_db(TAIL_DB) * rms_one(late)) / np.sqrt(size)
    return x + signal.fftconvolve(x, response)[:N]


def scene():
    """Superposition of sources: everything sounds on the same desk, in a small quiet room."""
    work = sheet() + scissors() + scuffs()
    sources = work + hands(work) + desk() + knocks() + punch()
    near = shaped(sources, lambda hz: peaks(DESK_RESONANCES, hz))
    return (room(near) + background())[None]


def record(dry):
    """Band limits and saturation: the microphone sheds the deepest bass, peaks are rounded, the top is cut."""
    level = from_db(-1.15) * cut(dry, 38, "high", order=3)
    rounded = PEAK_LIMIT * np.tanh(level / PEAK_LIMIT)
    return signal.sosfilt(signal.ellip(10, 0.1, 80, CUTOFF_HZ, fs=SR, output="sos"), rounded)


dry = scene()
out = record(dry)
master_out(out)
```